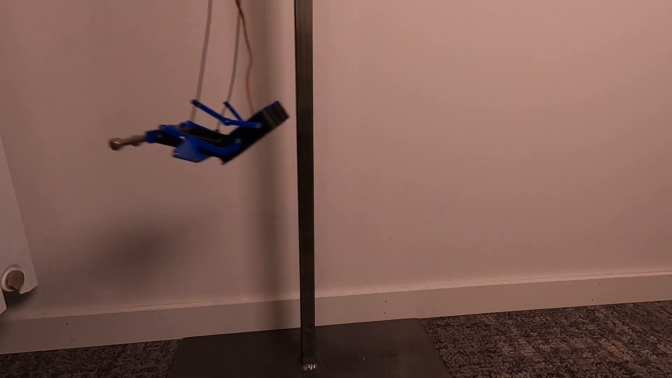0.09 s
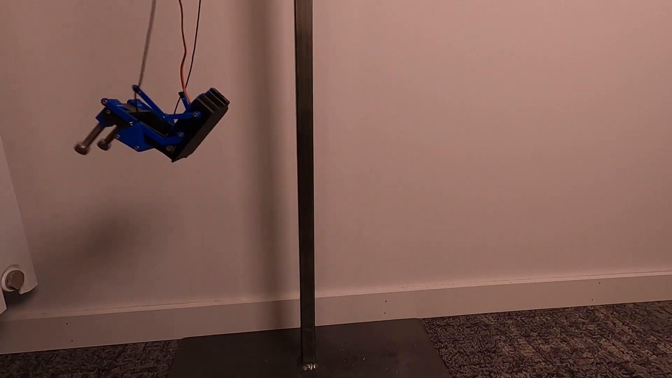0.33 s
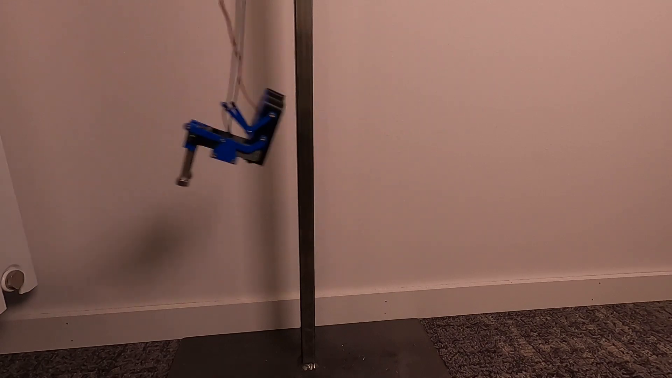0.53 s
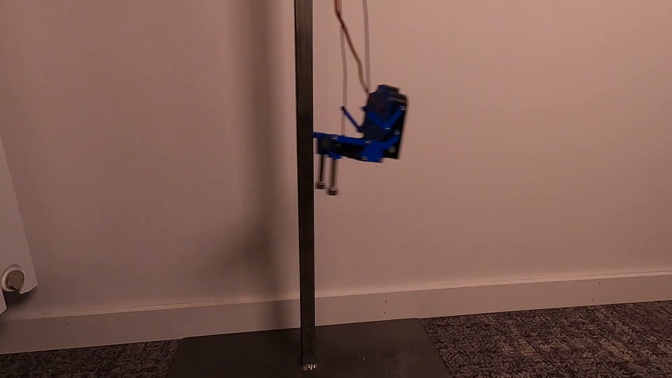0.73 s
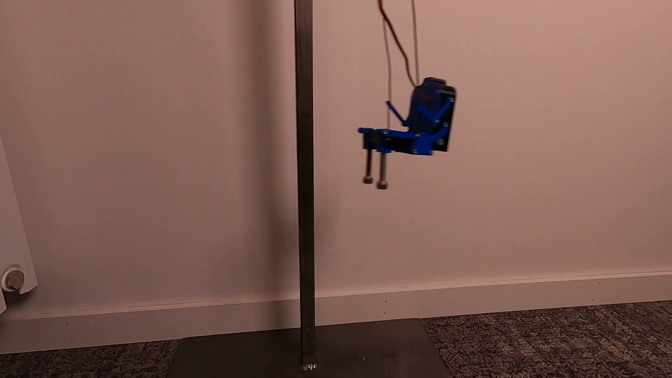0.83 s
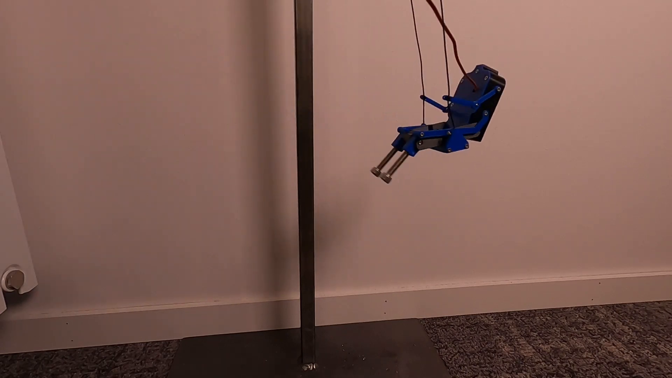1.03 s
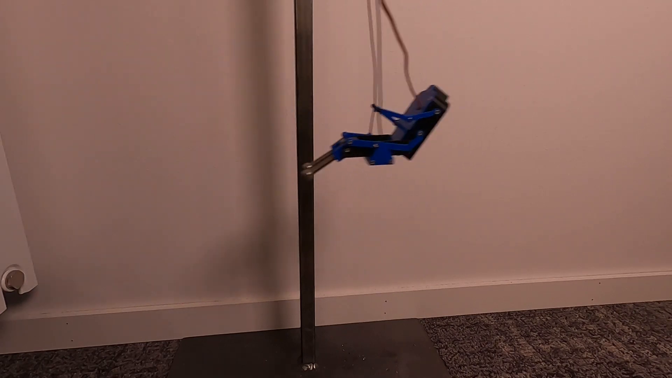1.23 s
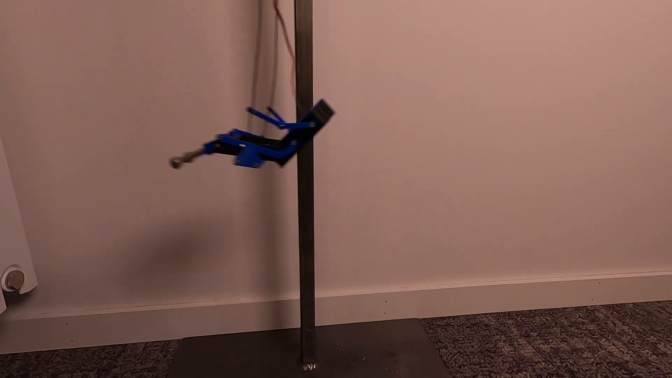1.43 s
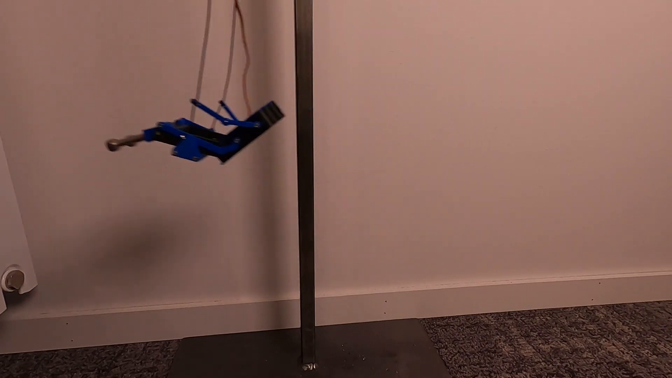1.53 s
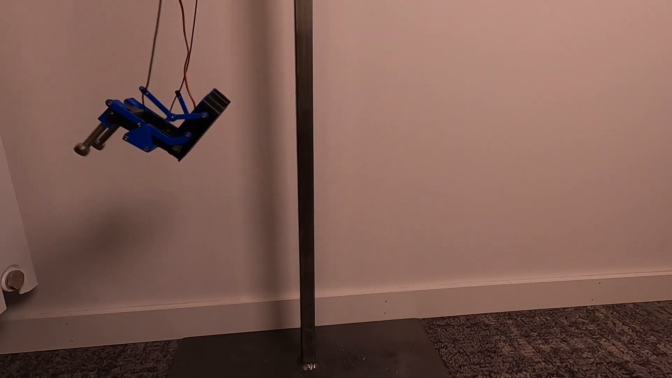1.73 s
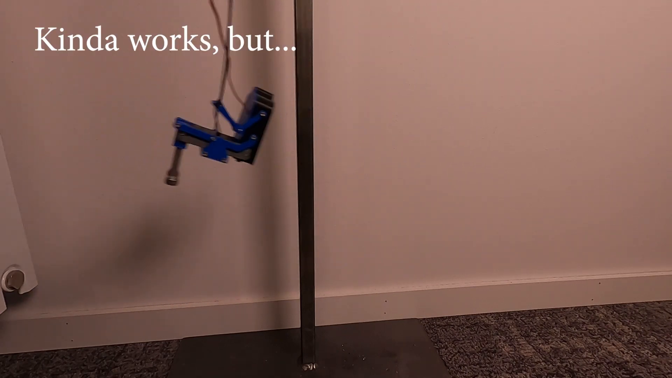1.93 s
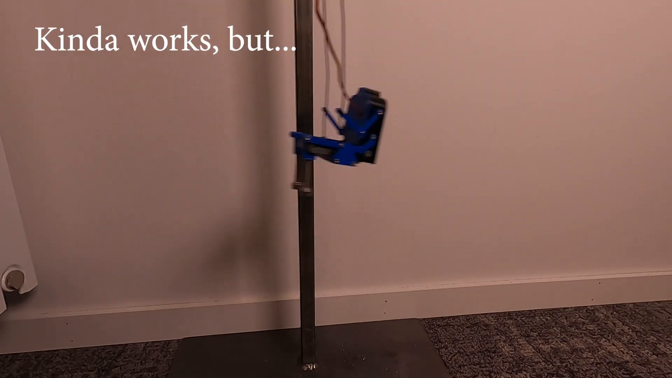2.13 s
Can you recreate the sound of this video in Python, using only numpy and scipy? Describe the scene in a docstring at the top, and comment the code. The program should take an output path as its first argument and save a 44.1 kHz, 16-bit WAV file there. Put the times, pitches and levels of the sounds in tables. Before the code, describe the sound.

Three short, rattling whirs of a toy robot's servo, separated by fast ticking.

```python
"""Three short, rattling whirrs in a quiet room, with fast ticking between them and a thin whine in two.
A small hobby servo on a swinging toy robot runs three times, and its gear teeth rattle the plastic case.
Between runs it holds its load: drive pulses, up to 50 a second, each kick the gears into a short rattle.
Faint grinding of the creeping gears, low room rumble and soft hiss lie underneath."""
import sys
import numpy as np
from scipy import signal
from scipy.io import wavfile

SR = 44100
rng = np.random.default_rng(int(sys.argv[2]) if len(sys.argv) > 2 else 0)


def materialize(psi):
    """Save the field psi as 16-bit PCM at rate SR to the path in sys.argv[1].

    A 1-D psi becomes a single channel; in a 2-D psi each row is a channel.
    """
    bounded = np.clip(np.atleast_2d(psi).T, -1, 1)
    quanta = np.round(bounded * 32767).astype(np.int16)
    wavfile.write(sys.argv[1], SR, quanta)


N = 97020
TIME = np.arange(N) / SR
LEFT_RIGHT = np.array([[1], [-1]])   # adds to the left channel, takes from the right


def amp(db):
    """Turn decibels into a factor to multiply by."""
    return 10 ** (np.asarray(db) / 20)


def rms_one(x):
    """Scale a signal to an average strength (rms) of 1."""
    return x / np.sqrt(np.mean(x ** 2) + 1e-20)


def at_hz(points, hz):
    """Read a table at one frequency, with octaves evenly spaced."""
    freqs, values = np.transpose(points)
    return np.interp(np.log(hz), np.log(freqs), values)


def gain_curve(points):
    """Join points of time and level into a gain for every sample."""
    return amp(np.interp(TIME, *np.transpose(points)))


def filtered(x, order, hz, kind):
    """Keep the lows, the highs or a band; a higher order cuts more steeply."""
    return signal.sosfilt(signal.butter(order, hz, kind, fs=SR, output="sos"), x)


def drift(rate_hz):
    """A smooth random wobble of typical size 1."""
    r = np.exp(-80 * np.pi * rate_hz / SR)
    slow = signal.lfilter([1], [1, -2 * r, r * r], rng.standard_normal(N // 40 + 2002))[2000:]
    return np.interp(np.arange(N) / 40, np.arange(len(slow)), rms_one(slow))


def banded_noise(spectrum, wobble_db, rate_hz):
    """Stereo noise in half-octave bands, each wobbling in level on its own."""
    # how alike left and right are: f/Hz, likeness (1 = the same)
    likeness = [(25, 0.79), (60, 0.99), (125, 0.9), (250, 0.19), (500, 0.29), (2000, 0.35), (10000, 0.1)]
    out, edges = 0, 18 * 2 ** np.arange(0, 10.1, .5)
    white = rng.standard_normal((2, 2, N + SR // 2))
    for k, (low, high) in enumerate(zip(edges, edges[1:])):
        hz = np.sqrt(low * high)
        if spectrum[0][0] <= hz <= spectrum[-1][0]:
            mid, side = filtered(white[k % 2], 2, [low, high], "band")[:, -N:]
            alike = at_hz(likeness, hz)
            band = np.sqrt(1 + alike) * mid + np.sqrt(1 - alike) * side * LEFT_RIGHT
            out = out + amp(at_hz(spectrum, hz) + wobble_db * drift(rate_hz)) * band
    return rms_one(out)


def rumble_and_hiss():
    """The quiet room: a slowly heaving rumble and a faint, flickering hiss."""
    # tone colour of each noise: f/Hz, relative level/dB
    rumble_colour = [(11, -34), (18, -4.5), (38, -4), (74, 2.5), (124, -7.5), (163, -5), (247, -25.5),
                     (316, -16), (385, -9.5), (422, -14.5), (540, -32), (700, -62), (910, -75),
                     (1540, -120)]
    hiss_colour = [(290, -30), (500, -27), (608, -14), (803, -20), (861, -16), (1140, -5), (1380, -13.5),
                   (2190, -18.5), (8000, -37), (14000, -60)]
    rumble = amp(-61.5) * banded_noise(rumble_colour, wobble_db=2.0, rate_hz=4.0)
    return rumble + amp(-77.5) * banded_noise(hiss_colour, wobble_db=4.5, rate_hz=15.0)


def room_echo(x):
    """Sound bounces around the room: six repeating echoes a side, softer and duller each time."""
    fade_s, dull_hz = 0.18, 9300   # the echoes lose 60 dB in fade_s
    out, dull = np.zeros((2, N)), np.exp(-2 * np.pi * dull_hz / SR)
    for k, lag in enumerate((rng.uniform(.004, .03, size=12) * SR).astype(int)):
        loop, state = x.copy(), [0.]
        gain = amp(-60 * lag / SR / fade_s)
        for i in range(lag, N, lag):
            back, state = signal.lfilter([gain * (1 - dull)], [1, -dull], loop[i - lag:i], zi=state)
            loop[i:i + lag] += back[:N - i]
        out[k % 2] += (loop - x) * (-1) ** (k // 2)
    return out


def creep():
    """Gears slip slowly under load and rub with a faint grinding noise."""
    # loudness of the grinding: t/s, level/dB
    loudness = [(0, -77), (.17, -66.5), (.2, -60), (.5, -57), (.62, -57.5), (.75, -55), (.9, -59),
                (.94, -59), (1.22, -59), (1.39, -68), (1.42, -69), (1.6, -70.5), (1.63, -65.5), (1.95, -63),
                (2.06, -70.5), (2.2, -69.5)]
    # its tone colour: f/Hz, relative level/dB
    colour = [(290, -50), (500, -11.5), (871, -17), (1160, -2), (1630, -4.5), (2230, -7.5), (5010, -11.5),
              (6570, -14.5), (8490, -21), (12300, -35), (15000, -51)]
    return gain_curve(loudness) * banded_noise(colour, wobble_db=1.0, rate_hz=60.0)


def whine():
    """A thin, wavering gear tone swells and fades while its pitch sags a little."""
    # whines: start/s, peak/s, end/s, start pitch/Hz, end pitch/Hz, peak level/dB
    whines = [(.36, .39, .49, 4910, 4770, -41), (1.73, 1.84, 1.92, 4930, 4800, -42)]
    waver_hz, flutter_db = 12, 1.5
    out = 0
    for start, peak, end, from_hz, to_hz, db in whines:
        pitch = np.interp(TIME, [start, end], [from_hz, to_hz]) + waver_hz * drift(44.6)
        swell = np.sqrt(np.interp(TIME, [start, peak, end], [0, 1, 0]))
        tone = np.sin(2 * np.pi * np.cumsum(pitch) / SR)
        out = out + amp(db + flutter_db * drift(25.0)) * swell * tone
    return out


def tooth_contacts(per_s):
    """Teeth click at random and rub; row 0 is for both ears, row 1 for their difference."""
    sizes = amp(np.minimum(rng.exponential(1, N), 4))
    hits = rng.random(N) < per_s / SR
    clicks = rms_one(sizes * hits * rng.choice([-1, 1], (2, N)))
    friction = 0.34 * rng.standard_normal((2, N))
    return rms_one(clicks + friction)


def resonate(x, hz, width):
    """Let a signal ring at one pitch; a narrower width in Hz rings longer."""
    r = np.exp(-np.pi * width / SR)
    gain = (1 - r * r) / 2
    return signal.lfilter([gain, 0, -gain], [1, -2 * r * np.cos(2 * np.pi * hz / SR), r * r], x)


def kicks():
    """Each drive pulse, and the clack as the gears reverse at the start of each run, takes up the slack in the
    gears: a hard first hit, then a dying rattle."""
    # kicks: t/s, relative level/dB, length/s, extra level of the low knock/dB
    pulses = [(0.1849, -52, 0.0076, -5), (0.2065, -40, 0.0046, -3), (0.224, -37, 0.0071, -4),
              (0.5255, -49, 0.005, 0), (0.5455, -49, 0.005, -2), (0.5654, -50, 0.0052, -3),
              (0.5841, -53, 0.0076, -4), (0.6031, -55, 0.0064, 2), (0.6257, -44, 0.0029, -5),
              (0.6455, -49, 0.0029, -5), (0.6654, -50, 0.0055, 1), (0.6856, -50, 0.0029, -3),
              (0.7031, -55, 0.0053, -1), (0.7252, -50, 0.0035, -3), (0.7462, -48, 0.004, -2),
              (0.7654, -48, 0.0035, -6), (0.7862, -49, 0.0042, -2), (0.8055, -51, 0.0033, -4),
              (0.8262, -49, 0.0042, -6), (0.8457, -47, 0.0034, -2), (0.8661, -47, 0.0046, -3),
              (0.8862, -47, 0.0036, -5), (0.9062, -48, 0.0033, -6), (0.9496, -39, 0.0072, -2),
              (1.2235, -55, 0.0055, -1), (1.244, -52, 0.0064, 0), (1.2661, -51, 0.0042, -3),
              (1.2867, -52, 0.0037, -2), (1.3057, -54, 0.006, -8), (1.3254, -56, 0.0057, 4),
              (1.3462, -55, 0.005, 6), (1.366, -55, 0.0064, -5), (1.3862, -52, 0.0033, 3),
              (1.6267, -52, 0.0069, -5), (1.6485, -41, 0.004, -4), (1.6664, -41, 0.006, -4),
              (1.9707, -47, 0.0043, -14), (1.9875, -52, 0.003, -2), (1.9907, -45, 0.0058, -10),
              (2.0077, -44, 0.0049, -12), (2.0165, -52, 0.003, -10), (2.0275, -45, 0.008, -4),
              (2.0491, -46, 0.0046, -18), (2.0667, -53, 0.0066, -5), (2.0882, -43, 0.0038, -9),
              (2.1081, -48, 0.0032, -12), (2.1278, -45, 0.0033, -4), (2.148, -52, 0.0044, -6),
              (2.1684, -47, 0.0043, -11), (2.184, -56, 0.003, -8), (2.1885, -48, 0.0045, -6)]
    # strength of their treble: t/s, relative level/dB
    treble_levels = [(.2, 3.5), (.5, -1), (.66, -3), (.72, -8), (.92, -8), (.95, -4), (1.22, -6),
                     (1.4, -5.5), (1.63, 3), (1.65, 12), (1.97, -1), (2.2, -7)]
    # strength of a gear that rings on after a kick: t/s, relative level/dB
    ring_levels = [(1.4, -15), (1.95, 2), (2.2, 0)]
    rise_s, settle_s = .0005, 0.014
    rattle = tooth_contacts(per_s=1800)
    bursts = knock = snap = 0
    for start, db, length, knock_db in pulses:
        age = np.maximum(TIME - start, 0)
        dying = np.exp(-(age / length) ** 2) + 0.22 * np.exp(-age / settle_s)
        shape = np.minimum(age / rise_s, 1) * dying
        burst = shape * rattle
        burst *= np.sqrt(np.sum(shape ** 2) / np.sum(burst ** 2, axis=1, keepdims=True))
        burst[0, int((start + rise_s) * SR)] += 5.0   # the hard first hit
        burst *= amp(db - 5.5)
        bursts = bursts + burst
        knock = knock + amp(knock_db + 1.5) * burst
        snap = snap + amp(-23.5 + .8 * (db + 40)) * burst[0]   # harder kicks snap brighter
    treble = gain_curve(treble_levels)
    snap = treble * filtered(snap, 2, [5150, 11300], "band")
    ring = gain_curve(ring_levels) * resonate(bursts[0], hz=4940, width=83)
    tick = amp(-16) * filtered(bursts[0], 2, [2200, 5500], "band")
    # three signals shake the case's low, middle and high pitches; the rest is heard directly
    return (knock, bursts, treble * bursts), snap + ring + tick


def plastic_case(rattle, slowdown_db, knock, kick_middle, kick_treble):
    """Teeth and kicks make the case ring; each run it turns another face to the listener."""
    # pitches the case rings at: f/Hz, width/Hz, gain in runs 1, 2, 3/dB, kick gain/dB, left over right/dB
    resonances = [(851.5, 63, -23.5, -16.5, -23.5, -52, -4.5), (988, 61, -17.5, -8, -17, -39, 1.5),
                  (1356, 103, -3.5, -4.5, -7, -5, 2.5), (1528, 141, -4, -7.5, -6.5, -0.5, 3),
                  (1658, 47.4, 0.5, 4, 0, 5.5, 1), (1775, 106, 0.5, 1, -1.5, 2.5, 3.5),
                  (1904, 93, 2.5, 1.5, 1.2, 1, 4), (2762, 153, -6.5, -8, -9.5, -8, 3.5),
                  (3023, 64, -3.5, -8.5, -7.5, -13.5, 5), (3350, 660, -12, -11, -12.5, -6, 4),
                  (4418, 367, -6.5, -8.5, -7.5, -6.5, 2.5), (4870, 145, -4, -7.5, -4, -6, 11.5),
                  (5060, 160, -9.5, -13, -5, -4, 1), (5436, 380, -4, -11, -6, -8, 1),
                  (6106, 116, -4.5, -16, -7.5, -9.5, -5.5), (6325, 70, -1.5, -18, -1, -11.5, 7),
                  (6930, 1220, -19, -21.5, -20.5, -22, 22), (7660, 430, -5.5, -17, -5, -8, 0),
                  (8426, 427, -1, -11.5, -4, -5.5, -0.5), (9250, 37, -13, -9, -12, -16, 10),
                  (9120, 270, -16, -12, -9, -15, 0), (10420, 1800, -15, -19, -17, -21, 2),
                  (11250, 78, -16, -22, -13, -26, 2.5), (11450, 240, -24, -29, -26, -30, -7),
                  (12960, 2000, -19, -23.5, -21, -61.5, 0.5)]
    turn_times = [.58, .86, 1.36, 1.64]   # start and end of two turns, in seconds
    centre_hz, damped_width_hz = 2570, 150
    stereo_share = np.linspace(.12, .5, len(resonances))
    lead_radians = np.linspace(0.078, 0.45, len(resonances))
    out = np.zeros((2, N))
    for k, (hz, width, first, second, third, kick_db, pan_db) in enumerate(resonances):
        octaves = np.log2(hz / centre_hz)
        fade_db = slowdown_db * max(.2 * octaves, -octaves ** 3)   # slow gears lose treble and bass
        face_db = np.interp(TIME, turn_times, [first, second, second, third])
        running = resonate(amp(face_db + fade_db + 1.6 * drift(15.5)) * rattle, hz, width)
        kick = knock if hz < 2300 else kick_middle if hz < 5800 else kick_treble
        kicked = resonate(amp(kick_db) * kick, hz, max(width, damped_width_hz))   # loaded gears damp it
        mid, side = (running + kicked) * (-1) ** k
        # the wave reaches one side slightly ahead of the other
        lead = lead_radians[k] * np.gradient(mid) / np.sin(2 * np.pi * hz / SR)
        side = stereo_share[k] * side - lead
        out += (mid + side * LEFT_RIGHT) * amp(pan_db / 2 * LEFT_RIGHT)
    return out


def servo():
    """Gear teeth rattle the case in three runs, and drive pulses kick it in between."""
    # gear rattle, one list a run: t/s, relative level/dB, left over right/dB
    runs = [
        [(.211, -51.5, 2), (.229, -52.5, -3), (.238, -40, -2.5), (.252, -38, -1), (.33, -36, 0),
         (.416, -36, -1.5), (.466, -38.5, 2), (.488, -45.5, -3), (.505, -61.5, 7)],
        [(.956, -45, 2.5), (.972, -41, -8), (1.0, -39, -1.5), (1.036, -34.5, -4.5), (1.1, -35, -4),
         (1.164, -38.5, -2), (1.19, -43.5, -1.5), (1.228, -55.5, 3)],
        [(1.654, -44.5, -2.5), (1.665, -50, 2), (1.672, -39, -1.5), (1.69, -38.5, 0), (1.766, -33.5, -0.5),
         (1.872, -35.5, -1), (1.914, -44.5, 0.5), (1.94, -51.5, 0), (1.96, -60, 0)],
    ]
    full_speed_db, roughness_db = -38.5, .8
    level_db = sum(np.interp(TIME, *np.transpose(run)[:2], left=0, right=0) for run in runs)
    is_running = level_db < 0
    rattle = tooth_contacts(per_s=4000) * is_running * amp(level_db + roughness_db * drift(40.0))
    slowdown_db = np.minimum(level_db - full_speed_db, 0)
    case_kicks, direct_kicks = kicks()
    out = plastic_case(rattle, slowdown_db, *case_kicks) + direct_kicks
    out = filtered(out, 4, 844, "high")
    out = filtered(out, 1, 10300, "low")
    times, _, pan_db = np.concatenate(runs).T
    return amp(15.0) * out * amp(np.interp(TIME, times, pan_db) / 2 * LEFT_RIGHT)


def scene():
    """The servo and its echo over grinding, rumble and hiss."""
    near = servo() + whine()
    return near + amp(-17) * room_echo(near.mean(axis=0)) + creep() + rumble_and_hiss()


def record(dry):
    """Cut away the very highest treble."""
    cutoff_hz = 16400
    return signal.sosfilt(signal.cheby2(12, 70, cutoff_hz, fs=SR, output="sos"), dry)


dry = scene()
out = record(dry)
materialize(out)
```